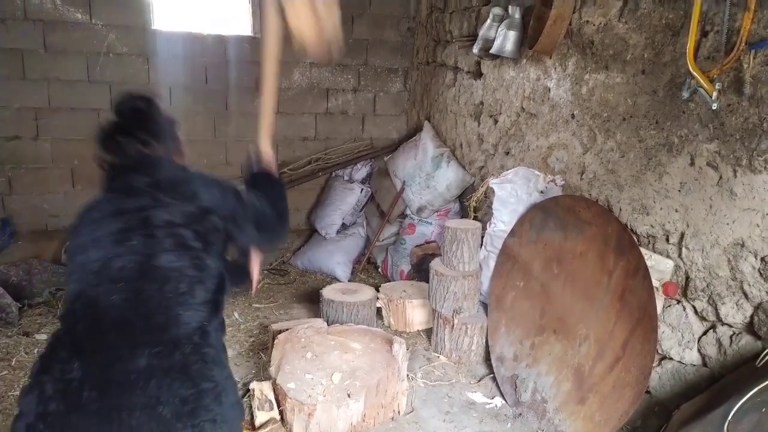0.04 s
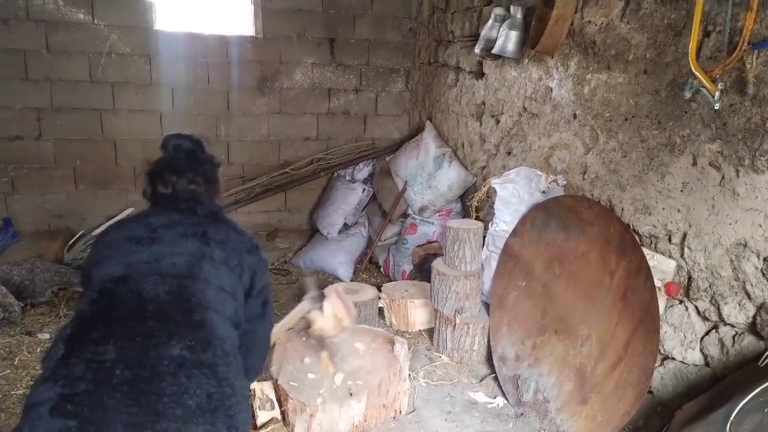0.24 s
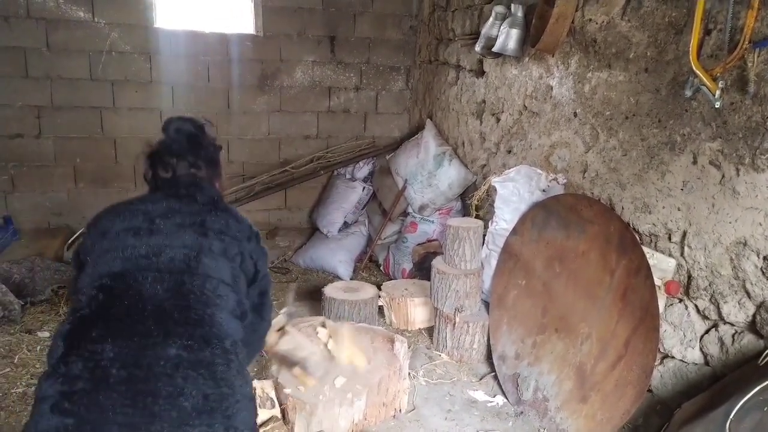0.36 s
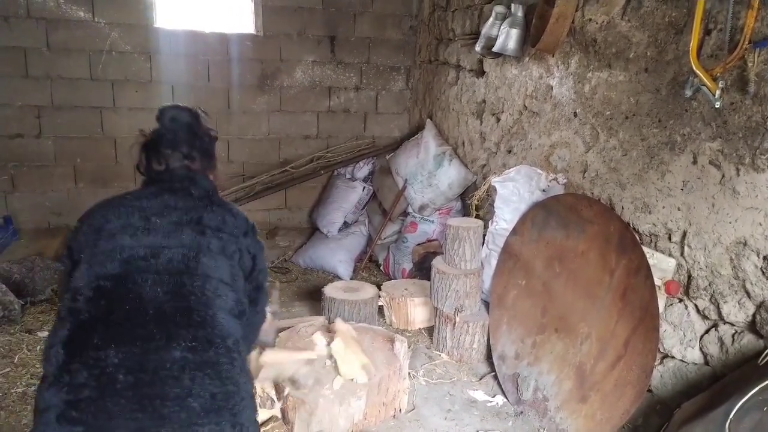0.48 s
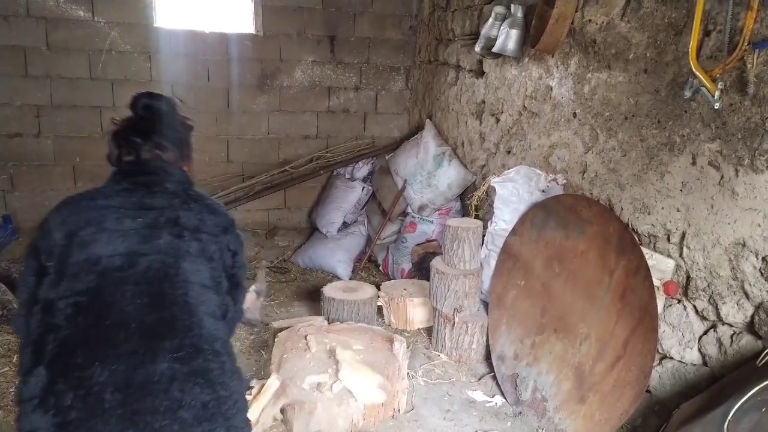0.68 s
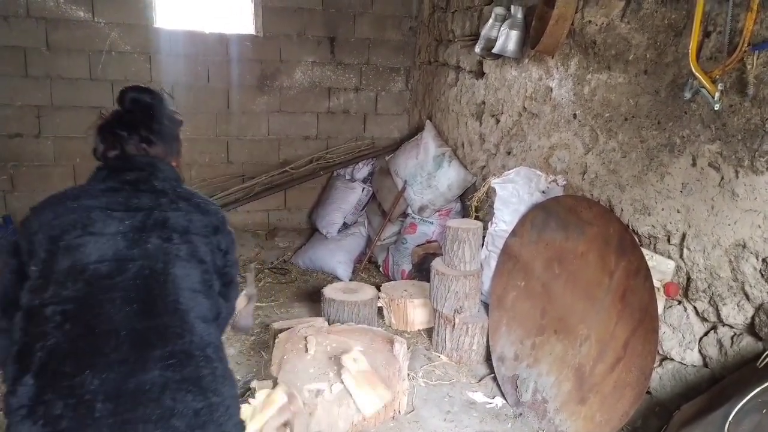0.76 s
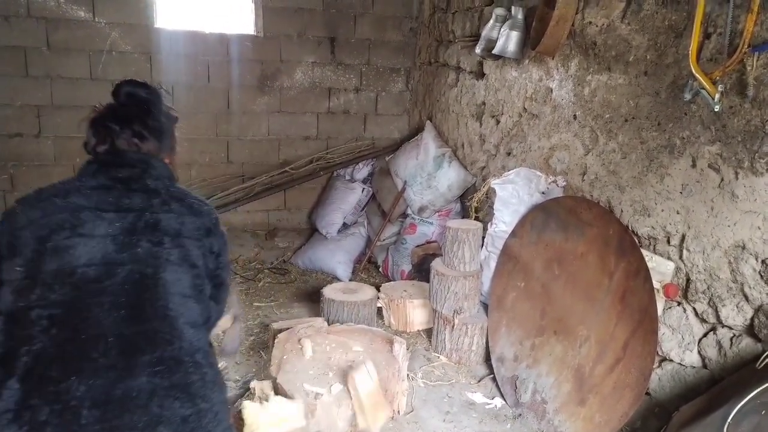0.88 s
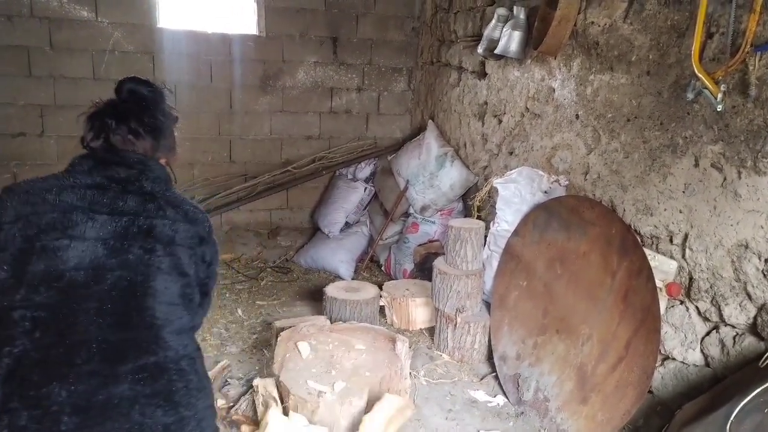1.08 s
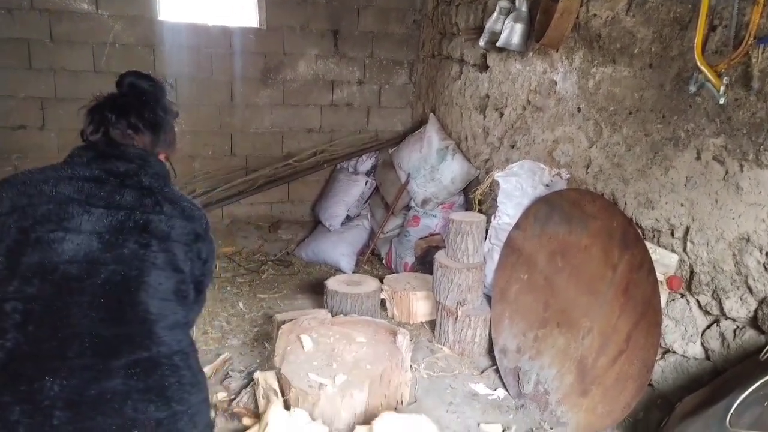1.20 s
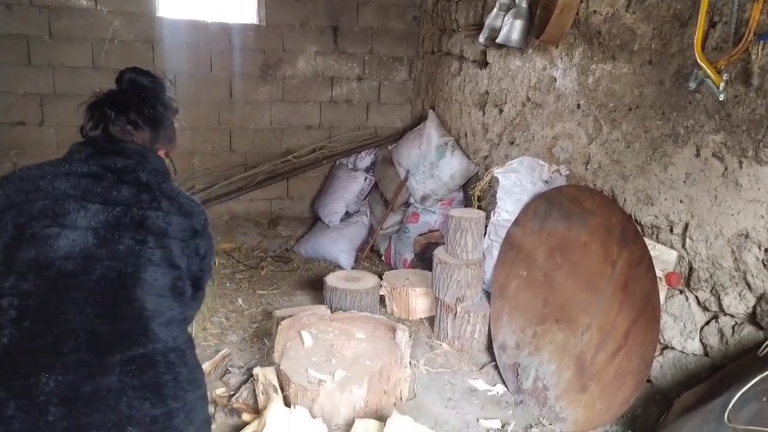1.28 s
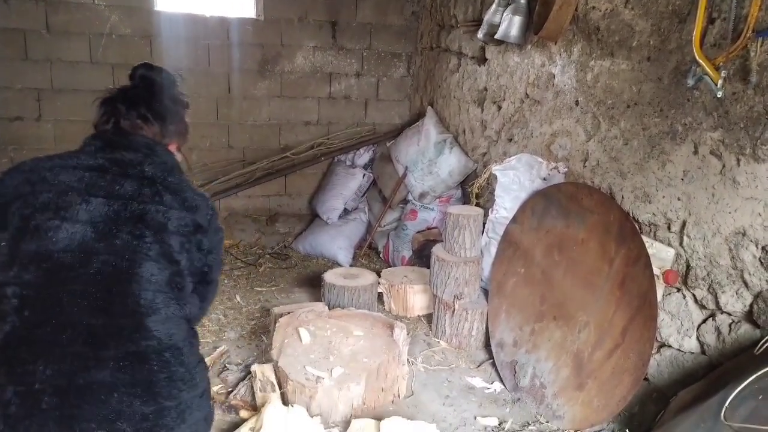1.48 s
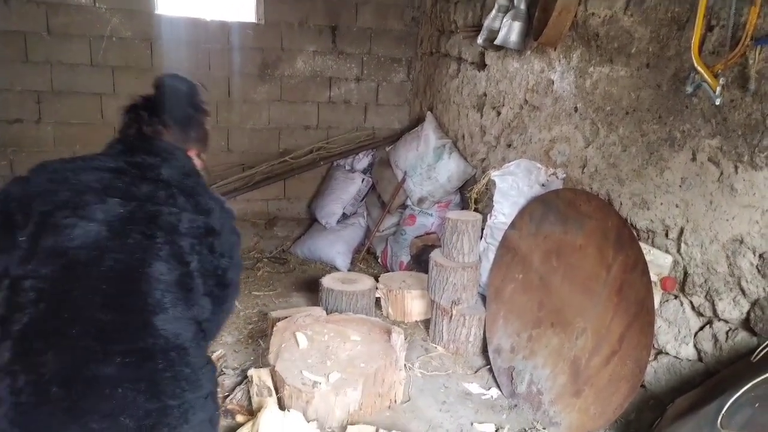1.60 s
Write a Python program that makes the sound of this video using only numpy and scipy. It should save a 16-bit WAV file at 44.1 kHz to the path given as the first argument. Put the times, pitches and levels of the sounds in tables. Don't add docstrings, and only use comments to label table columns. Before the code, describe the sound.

An axe cracks through a log on a chopping block, then split pieces snap and tumble down

```python
import sys
import numpy as np
from scipy import signal
from scipy.io import wavfile

SR = 44100
rng = np.random.default_rng(int(sys.argv[2]) if len(sys.argv) > 2 else 0)


def voltage_ratio(level):
    return 10 ** (np.asarray(level, float) / 20)


def store_wav(level_fs):
    pcm = np.round(np.clip(np.atleast_2d(level_fs), -1, 1) * 32767)
    wavfile.write(sys.argv[1], SR, pcm.T.astype(np.int16))


N = 72765

# start in seconds, peak level in dB, contact in ms.
BLOW_HITS = [
    (.2395, -2.5, 3.36),
    (.245, -8.5, 1.15),
    (.253, -11, 1.7),
    (.26, -6, 2.03),
    (.27, -10, 5.5),
    (.28, -19, 1.9),
    (.29, -15, 3),
    (.305, -15, 1.8),
    (.32, -53, 7.3),
]
# start in seconds, peak level in dB, note in Hz, t60 in ms.
CLACK_NOTES = [(0.2388, -9, 1186, 11), (.248, -9.5, 600, 28), (.2595, -16, 600, 18),
               (0.291, -25.5, 71, 340), (.2402, -6, 2347, 14.7), (.2455, -4, 2080, 10.6),
               (.284, -8.5, 1825, 14), (.2895, -11.5, 480, 19), (.264, -13, 330, 35),
               (.314, -11.5, 2100, 9.1), (.325, -15.5, 1980, 13), (.472, -36, 325, 42),
               (0.5542, -13, 4370, 11.4), (0.646, -23, 8700, 11), (0.8788, -30, 8150, 4.6),
               (0.741, -44.5, 70, 110), (0.497, -36.5, 75, 120), (0.522, -38, 73.3, 68),
               (1.0047, -25.5, 1670, 13), (1.011, -22, 2215, 13), (1.015, -25, 298, 60),
               (1.033, -27.5, 456, 13.5), (1.043, -27, 2200, 10), (1.3102, -16, 2090, 17),
               (1.3174, -14, 1650, 17), (1.3258, -8, 1275, 12.6), (1.3318, -10, 950, 10.4),
               (1.34, -15, 1500, 9.5), (1.3446, -11.5, 1470, 16), (1.35, -23.5, 280, 52),
               (1.357, -17, 1310, 15), (1.371, -21, 900, 10), (1.379, -22, 1500, 10),
               (1.393, -41, 1570, 9.9), (1.41, -23.5, 2450, 16)]
# start in seconds, peak level in dB, contact in ms.
SLIVER_SNAPS = [
    (.5555, -11.5, 2.14),
    (.6762, 5.5, 0.82),
]
# start in seconds, peak level in dB, contact in ms.
HALF_DROPS = [
    (1.307, -31, 2.4),
    (1.31, -15.5, 4.2),
    (1.317, -36, 1.6),
    (1.325, -19.5, 4.2),
    (1.332, -17.5, 6.5),
    (1.346, -29, 4.5),
    (1.356, -26, 4.7),
    (1.379, -41, 4.7),
]
# start in seconds, peak level in dB, contact in ms.
EARTH_THUDS = [
    (.258, -20, 18),
    (.49, -35.5, 3.1),
    (.66, -37.5, 15.6),
    (.77, -35.5, 3.3),
    (1.03, -32, 4.3),
    (1.332, -13, 3.34),
    (1.35, -24, 2.3),
]
# start in seconds, peak level in dB, contact in ms.
BILLET_KNOCKS = [(.466, -28, 7.8), (.478, -40.5, 23), (.497, -77, 13), (.645, -35, 23), (1.005, -29.5, 3.5),
                 (1.011, -28.5, 2.1), (1.0175, -31.5, 7.4), (1.124, -42, 3.3), (1.14, -34, 5),
                 (1.162, -36, 3.9), (1.45, -41, 33.4), (1.49, -38.5, 11.2), (1.62, -43.5, 39)]
# start in seconds, peak level in dB, contact in ms.
CHIP_TICKS = [
    (.538, -25.5, 1.05),
    (.644, -23, 3.4),
    (.879, -32, 3.7),
    (1.0055, -23, 3.8),
    (1.0095, -21, 5.8),
    (1.125, -37.5, 4.2),
    (.995, -48.5, 6),
    (1.395, -22.5, 5),
    (.673, -38, 2.3),
]
# start in seconds, rise in s, hold in s, fall in dB per s, level in dB.
DRAG_MOVES = [
    (0.054, 0.033, 0.01, 292, -65.5),
    (0.104, 0.018, 0.0081, 291, -76),
    (0.187, 0.069, .04, 302, -61.5),
    (0.365, 0.021, 0.072, 214, -49.5),
    (0.63, 0.0034, 0.034, 293.5, -42),
    (0.846, 0.021, 0.25, 192.5, -63.5),
    (1.112, 0.014, 0.16, 86, -61),
    (1.292, 0.05, 0.016, 93, -38),
    (1.48, 0.14, .15, 67, -52.5),
]
# frequency in Hz, level in dB.
BLOW_COLOUR = [(60, -33.5), (200, -13.5), (300, -4.5), (520, -7.5), (850, 0.5), (1200, -6), (2000, -10),
               (5500, -15.5), (9500, -12), (16000, -24)]
SNAP_COLOUR = [(180, -50.5), (300, -50.5), (774, -26), (2100, -11), (3350, -19.5), (8360, -10),
               (10200, -14), (14700, -21), (16000, -43.5)]
DROP_COLOUR = [(100, -47), (400, -14), (1550, 0), (2600, -11.5), (3420, -18.5), (9130, -15.5),
               (16000, -39.5)]
EARTH_COLOUR = [(60, -54), (120, -17), (220, -1), (500, -19), (2000, -80)]
KNOCK_COLOUR = [(35, -39), (60, -13), (315, 0.5), (1120, -10.5), (2120, -8), (3180, -17), (3710, -63),
                (6000, -54), (7800, -48), (13200, -120)]
TICK_COLOUR = [(470, -18), (800, -8.5), (2730, -7.5), (4180, -9.5), (5240, -7), (9570, 1), (16000, -21)]
DRAG_COLOUR = [(88, -70), (150, -12), (578, -29), (612, -19), (805, -12), (3490, -10.5), (8730, -4.5),
               (14000, -15.5), (16000, -45)]
# frequency in Hz, level in dB.
AIR_COLOUR = [(12, -28), (20, -18), (68, -24), (134, -29.5), (1090, -35.5), (3340, -41.5), (4540, -48),
              (10800, -34.5), (16000, -45)]
# frequency in Hz, level in dB, t60 in seconds.
BLOCK_MODES = [(67, -6.5, 0.086), (325, 5, 0.052), (280, -23, 0.09), (428, -27, 0.054), (600, -1, 0.014),
               (740, -13, .05), (825, -3, 0.1), (950, -5, 0.024), (1556, 2.5, 0.014), (2100, -19.5, 0.017)]
SLIVER_MODES = [(2200, 0, 0.0038), (1500, -12, 0.012), (4600, -13, 0.0068), (5830, -12, 0.0026),
                (6130, -6.5, 0.0027), (7920, 0, 0.0022), (9040, -6.5, 0.0058), (10980, -9, .003)]
HALF_MODES = [(345, 4.5, 0.04), (628, -36, 0.015), (900, -3, 0.043), (1290, -12, 0.039),
              (1550, -13, 0.0081), (2260, 21.5, 0.0097)]
EARTH_MODES = [(119.4, -6, 0.21), (173, 5, 0.098)]
BILLET_MODES = [(72, -10, .2), (305, 0, .09), (600, -12, .05), (2150, -18, .02)]
CHIP_MODES = [(8840, 0, 0.005), (9300, -3, 0.005)]
# frequency in Hz, level in dB, t60 in seconds.
PAN_MODES = [(437, -8, 2.5), (655, 0, .7)]
# frequency in Hz, t60 in seconds.
BARN_DECAY = [(60, 0.15), (250, 0.44), (800, 0.34), (2000, 0.28), (5000, 0.21), (10000, 0.21),
              (15000, 0.19)]
# frequency in Hz, left-right likeness from 0 to 1.
PORT_LIKENESS = [(60, 0.55), (250, 1), (500, 0.81), (1000, .1), (2000, 0.12), (8000, 0.14)]
# delay in ms, level in dB.
WALL_ECHOES = [(3.5, 0), (5.5, 0), (7.8, -3), (9.5, -13.5), (11.5, 2), (16, -9.5)]


def blow():
    return hits(BLOW_HITS, BLOW_COLOUR, BLOCK_MODES, ring_db=-4.0, rough=1.57, hold_s=0.006, far_ring=0.41)


def clacks():
    t, out = np.arange(SR // 3) / SR, np.zeros(N + SR)
    for start, db, hz, t60_ms in CLACK_NOTES:
        fade = voltage_ratio(db - 60000 * t / t60_ms) * np.minimum(t * hz / .4, 1)
        note = np.sin(2 * np.pi * hz * t)
        overtone = 0.34 * np.sin(2 * np.pi * 2.7 * hz * t) * fade / voltage_ratio(db)
        out[round(start * SR):][:len(t)] += fade * (note + overtone)
    return out[:N], out[:N]


def snaps():
    return hits(SLIVER_SNAPS, SNAP_COLOUR, SLIVER_MODES, ring_db=2.5, rough=0.81, hold_s=0.00217,
                crack_gain=0.88, far_ring=0.023)


def drops():
    return hits(HALF_DROPS, DROP_COLOUR, HALF_MODES, ring_db=-8.0, rough=1.42, crack_gain=0.92)


def thuds():
    return hits(EARTH_THUDS, EARTH_COLOUR, EARTH_MODES, ring_db=-3.0, rough=0.84, hold_s=0.01, crack_gain=0.55)


def knocks():
    return hits(BILLET_KNOCKS, KNOCK_COLOUR, BILLET_MODES, ring_db=-6.5, rough=0.85)


def ticks():
    return hits(CHIP_TICKS, TICK_COLOUR, CHIP_MODES, ring_db=-6, rough=.9)


def drags():
    t = np.arange(N) / SR
    level = np.zeros(N)
    for start, rise, hold, fall, db in DRAG_MOVES:
        dying = voltage_ratio(db - fall * np.maximum(t - start - rise - hold, 0))
        level += dying * np.clip((t - start) / rise, 0, 1)
    sizes = voltage_ratio(4.0 * np.minimum(rng.exponential(1, N), 5))
    grains = sizes * rng.standard_normal(N) * (rng.random(N) < .1)
    rustle = level * evened(signal.oaconvolve(grains, colour(DRAG_COLOUR))[:N])
    return rustle, rustle


def pan():
    u = np.maximum(np.arange(N) / SR - BLOW_HITS[0][0], 0)
    return sum(voltage_ratio(-44 + db - 60 * u / t60) * np.sin(2 * np.pi * hz * u) for hz, db, t60 in PAN_MODES)


def air():
    white = pair_noise(size=N, field=lambda hz, t: 0 * hz * t)
    return voltage_ratio(-60) * evened(signal.oaconvolve(white, colour(AIR_COLOUR)[None])[:, :N])


def hits(events, tone, modes, ring_db, rough, hold_s=0, crack_gain=1, far_ring=1):
    t, push, click = np.arange(N) / SR, np.zeros(N), np.zeros(N)
    grit, body = rng.standard_normal(N), colour(tone)
    for start, db, ms in events:
        u = np.clip((t - start) * 1000 / ms, 0, 30)
        release = np.where(u < 1, 1, np.exp(-(u - 1) / 0.13))
        push += voltage_ratio(db) * np.minimum(u / 0.22, 1) * release
        click[round(start * SR)] += voltage_ratio(db) * np.sqrt(ms * SR / 1000)
    ring = voltage_ratio(ring_db) * signal.oaconvolve(click, ringing(modes, hold_s))[:N]
    rough_push = push * np.sign(grit) * abs(grit) ** rough
    crack = crack_gain * signal.oaconvolve(rough_push, body)[:N]
    far_click = signal.oaconvolve(click, body)[:N]
    return 0.46 * (crack + ring), 0.5 * (far_click + far_ring * ring)


def ringing(modes, hold_s):
    t = np.arange(SR // 4) / SR
    dying = np.maximum(t - hold_s, 0)
    ring = sum(voltage_ratio(db - 60 * dying / max(t60, .002)) * np.sin(2 * np.pi * hz * t) for hz, db, t60 in modes)
    ring = ring * np.minimum(t / (.0002 + .3 * hold_s), 1)
    return ring / np.linalg.norm(ring)


def colour(tone):
    hz = abs(np.fft.fftfreq(8192, 1 / SR))
    logs = np.log(voltage_ratio(np.maximum(read(tone, hz), -90)))
    taps = np.fft.ifft(np.exp(np.conj(signal.hilbert(logs)))).real[:3000]
    return taps / np.linalg.norm(taps)


def read(points, hz):
    f, value = np.transpose(points)
    return np.interp(np.log(hz + 1), np.log(f + 1), value)


def evened(x):
    return x / np.sqrt(np.mean(x ** 2) + 1e-20)


def barn(near, far, lag, wet_db, wall_db):
    tail = pair_noise(size=SR // 2, field=lambda hz, t: -60 * t / np.maximum(read(BARN_DECAY, hz), .03))
    tail = tail * np.clip((np.arange(SR // 2) / SR - .003) / 0.0011, 0, 1)
    draw, early = rng.random((len(WALL_ECHOES), 2)), np.zeros((2, 1500))
    for (ms, db), r in zip(WALL_ECHOES, draw):
        arrival = (ms * SR / 1000 + 24 * r).astype(int)
        early[[0, 1], arrival] += voltage_ratio(db + wall_db) * np.sign(r[0] - .3)
    early[[0, 1], [lag, 0]] += 1
    late = signal.fftconvolve(far[None], voltage_ratio(wet_db) * tail / np.linalg.norm(tail[0]), axes=1)
    return signal.oaconvolve(near[None], early, axes=1)[:, :N] + late[:, :N]


def pair_noise(size, field):
    frames, hz = size // 64 + 5, np.fft.rfftfreq(256, 1 / SR)
    a, b, c, d = rng.standard_normal((frames, 129, 4)).T
    same = np.clip(read(PORT_LIKENESS, hz), -1, 1)[:, None]
    left, other = a + 1j * b, c + 1j * d
    z = np.array([left, same * left + np.sqrt(1 - same ** 2) * other])
    z = z * voltage_ratio(field(hz[:, None], np.arange(frames) * 64 / SR))
    return signal.istft(z, nperseg=256, noverlap=192)[1][:, :size]


def overload(x, ceiling=.65):
    return ceiling * np.tanh(x / ceiling)


def sway():
    dip_s, swing_hz, settle_s = .07, 2.3, .145
    u = np.arange(N) / SR - BLOW_HITS[0][0]
    dip = voltage_ratio(-26.5) * np.sin(np.pi * np.clip(u / dip_s, 0, 1)) ** 2
    v = np.maximum(u - dip_s * .7, 0)
    swing = voltage_ratio(-25.7) * np.sin(2 * np.pi * swing_hz * v) * np.exp(-v / settle_s)
    return (swing - dip) * voltage_ratio([[-2.5], [2.5]])


def scene():
    rustle, slivers = drags(), snaps()
    mix = overload(barn(*blow(), lag=8, wet_db=1.87, wall_db=-5.5))
    mix = mix + 0.66 * barn(*slivers, lag=4, wet_db=1.07, wall_db=-10.5)
    mix = mix + barn(*thuds(), lag=4, wet_db=-9.0, wall_db=-15.0)
    mix = mix + barn(*ticks(), lag=3, wet_db=-1, wall_db=-6)
    mix = mix + barn(*knocks(), lag=4, wet_db=-2.0, wall_db=-6)
    mix = mix + barn(*drops(), lag=12, wet_db=-0.5, wall_db=-4)
    mix = mix + 0.56 * barn(*rustle, lag=2, wet_db=10, wall_db=-12.5)
    mix = mix + air() + pan()
    return mix + barn(*clacks(), lag=6, wet_db=-9, wall_db=-15.5)


def low_pass(x):
    return signal.sosfilt(signal.butter(12, 16630, fs=SR, output="sos"), x)


def record(dry):
    shelf_hz, dull = 9920, voltage_ratio(-7)
    edge = [0, shelf_hz * .97, shelf_hz * 1.03, 16300, 16700, SR / 2]
    port = signal.firwin2(301, edge, [1, 1, dull, dull, 0, 0], fs=SR)
    dulled = signal.oaconvolve(dry, port[None], "same", axes=1)
    return low_pass(np.clip(dulled + sway(), -.99, .99))


dry = scene()
out = record(dry)
store_wav(out)
```